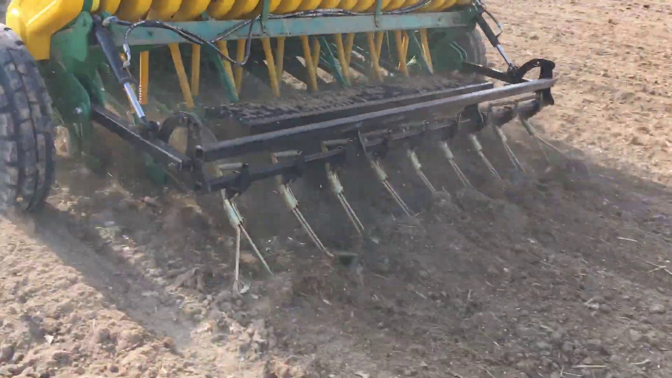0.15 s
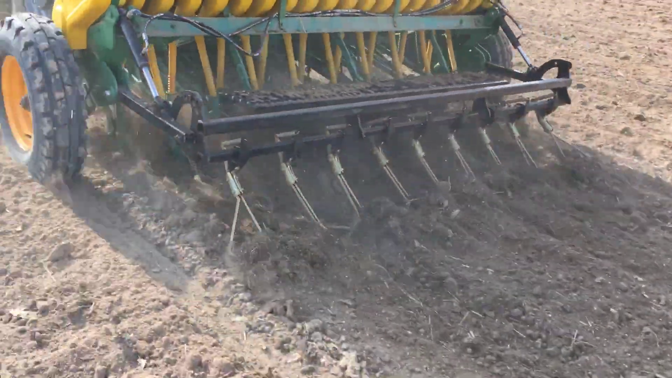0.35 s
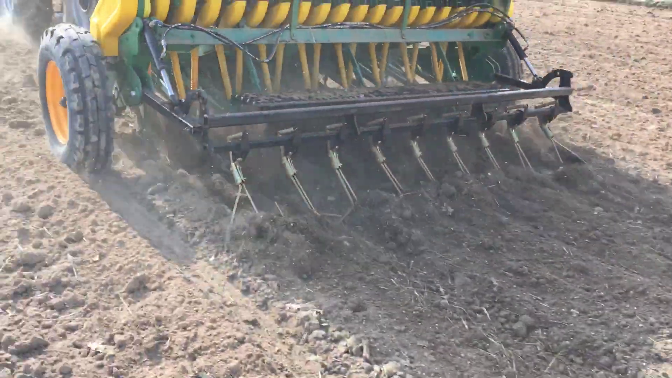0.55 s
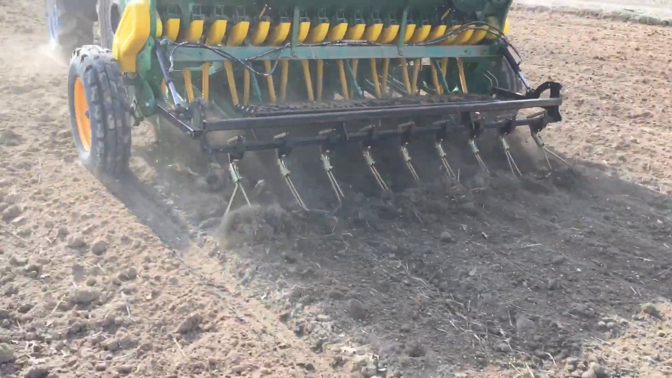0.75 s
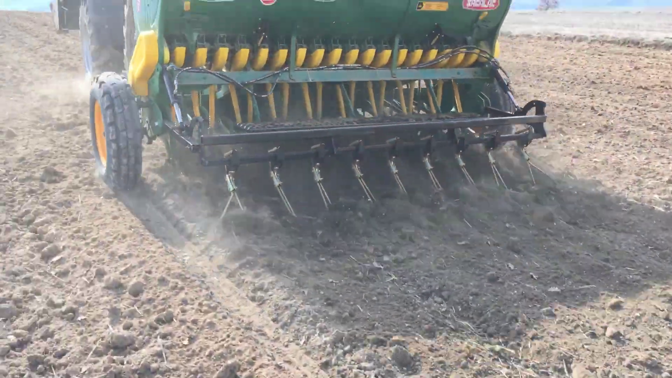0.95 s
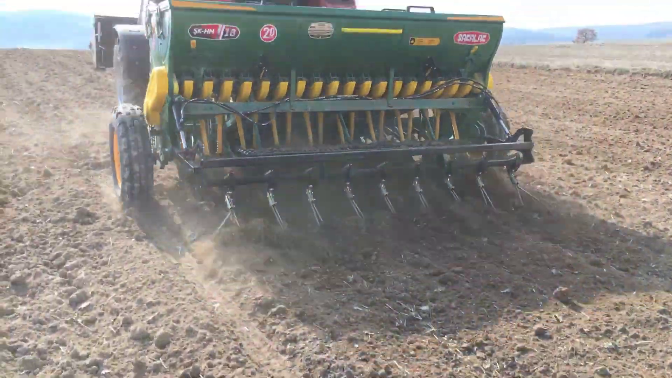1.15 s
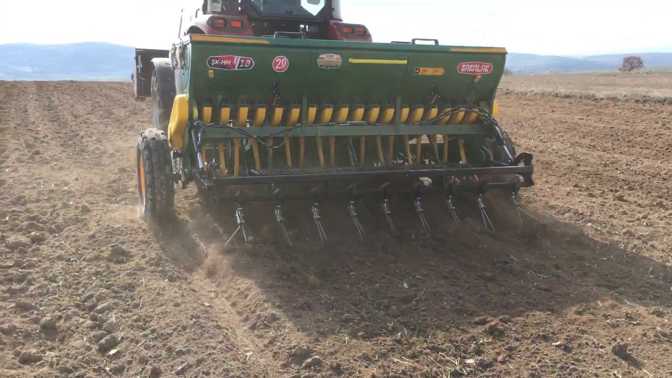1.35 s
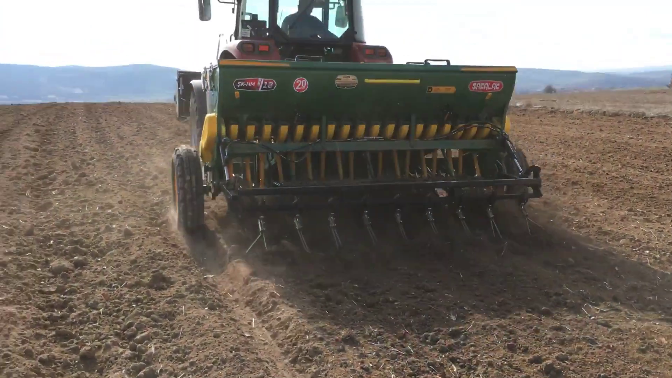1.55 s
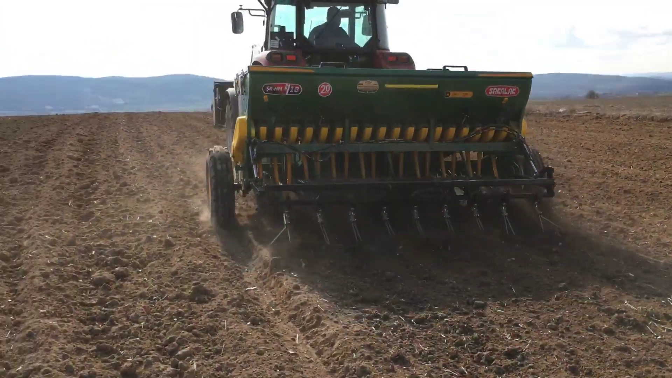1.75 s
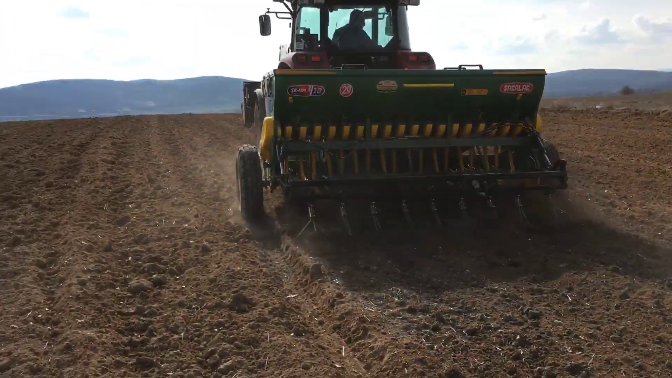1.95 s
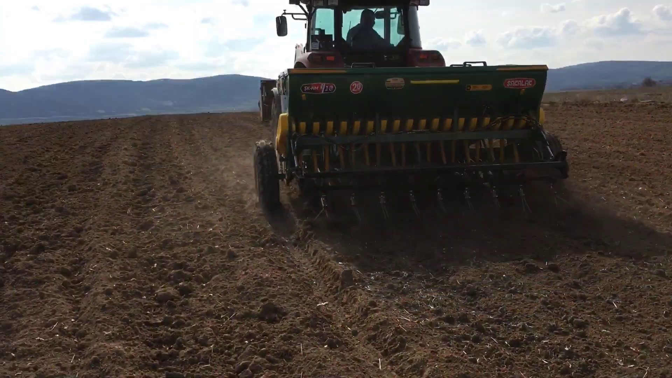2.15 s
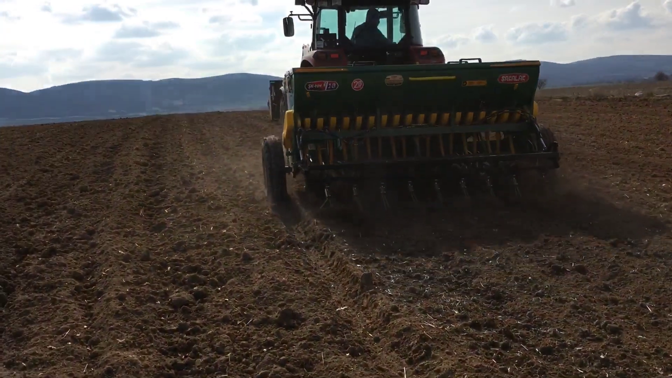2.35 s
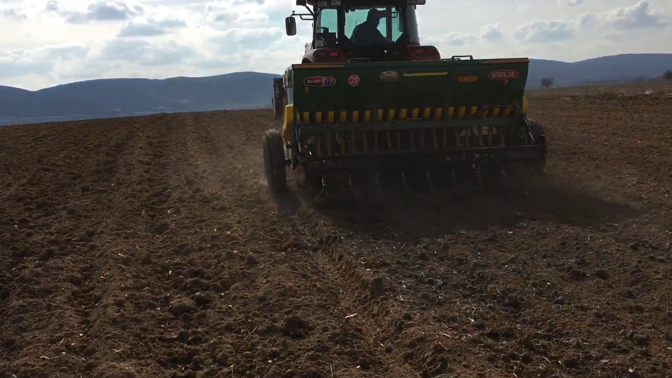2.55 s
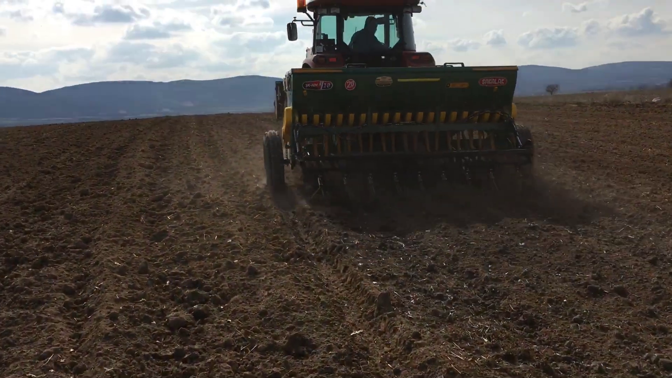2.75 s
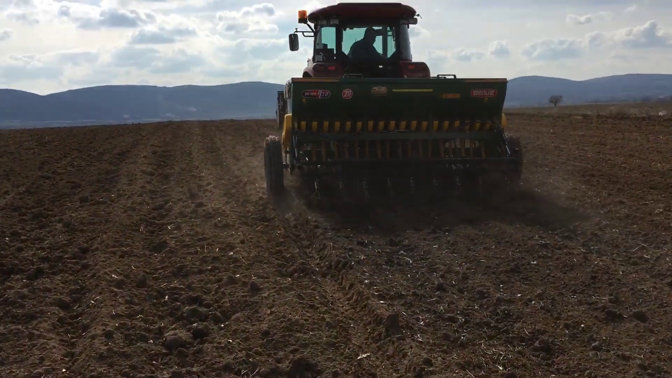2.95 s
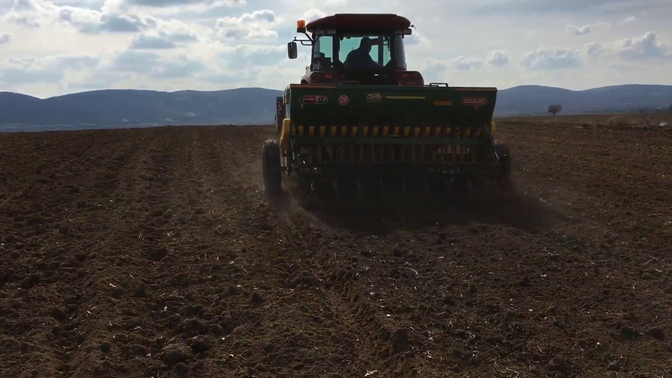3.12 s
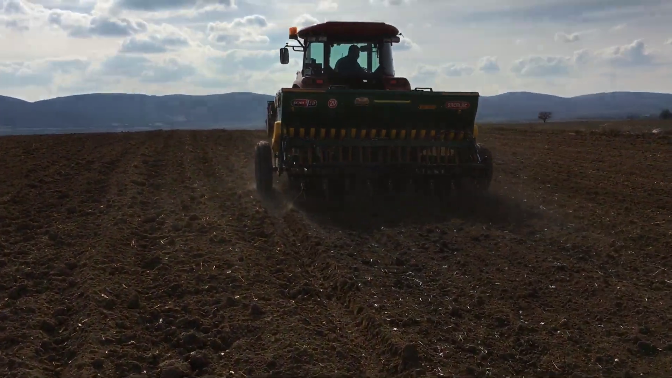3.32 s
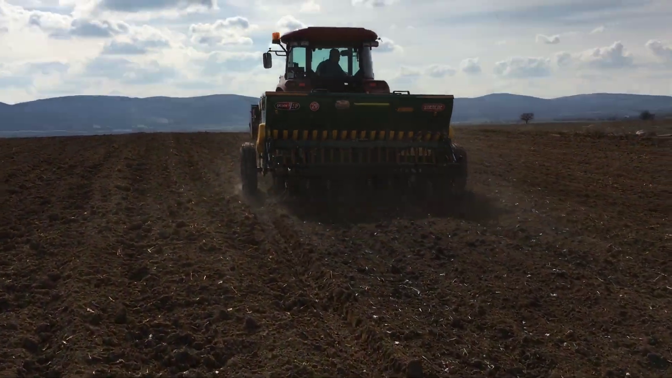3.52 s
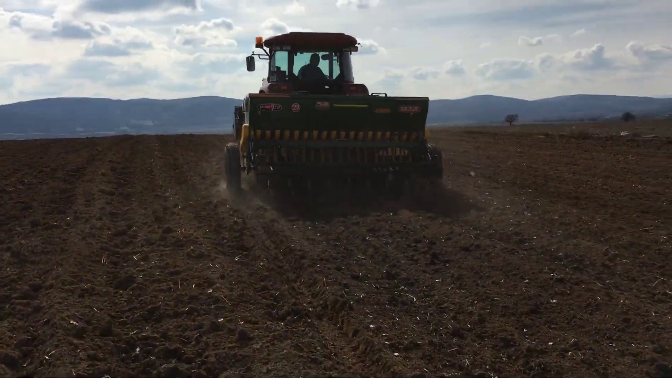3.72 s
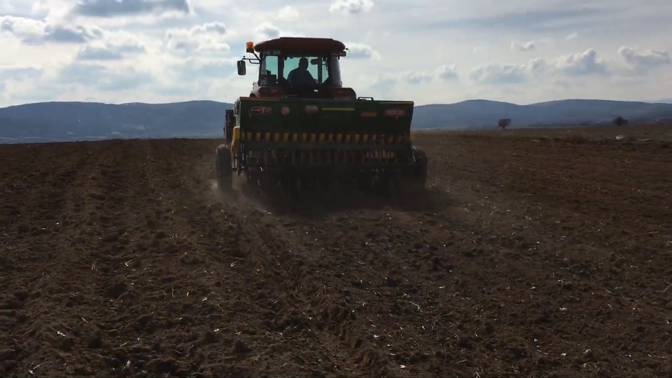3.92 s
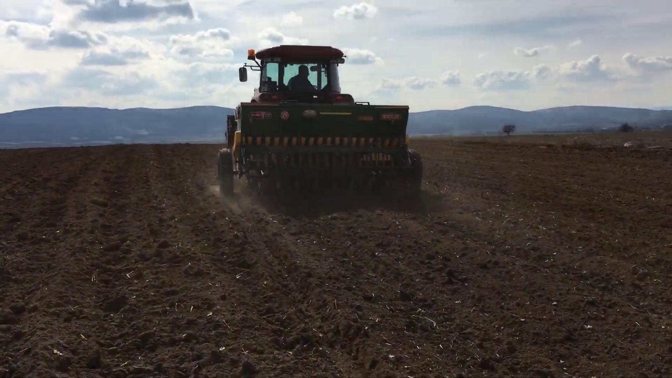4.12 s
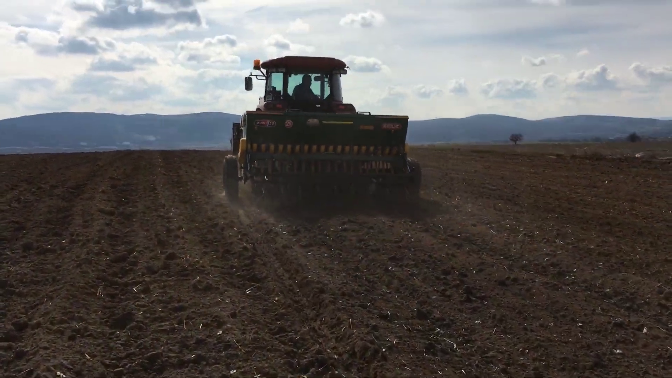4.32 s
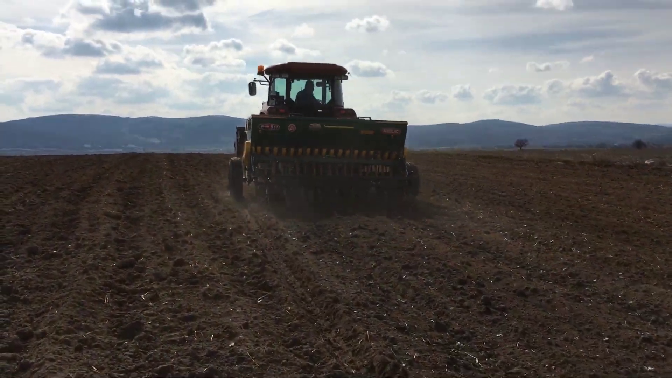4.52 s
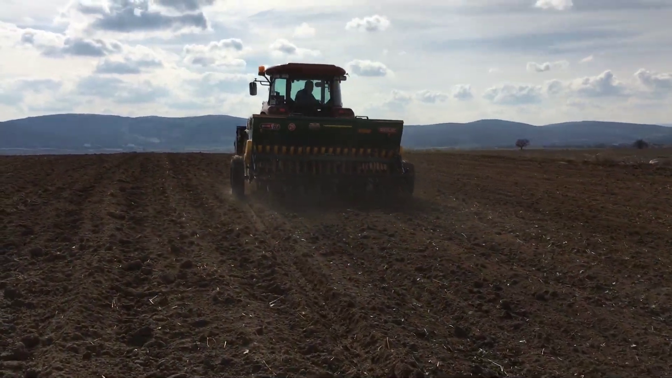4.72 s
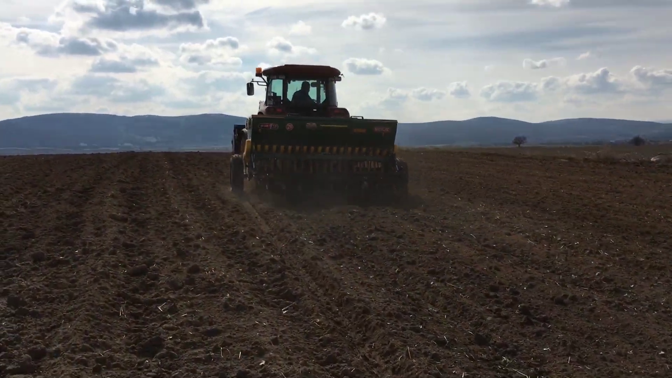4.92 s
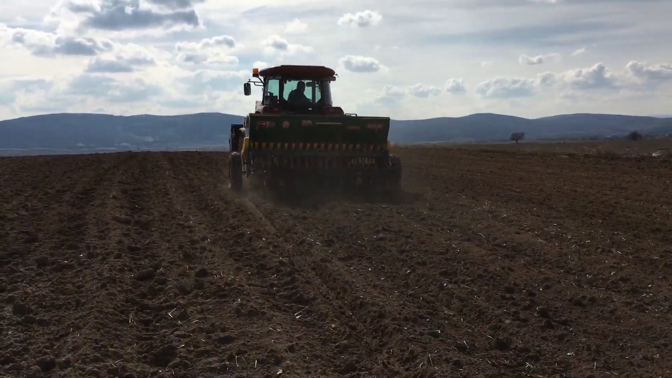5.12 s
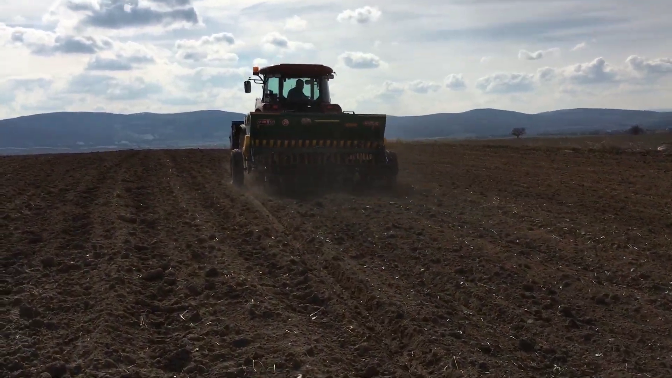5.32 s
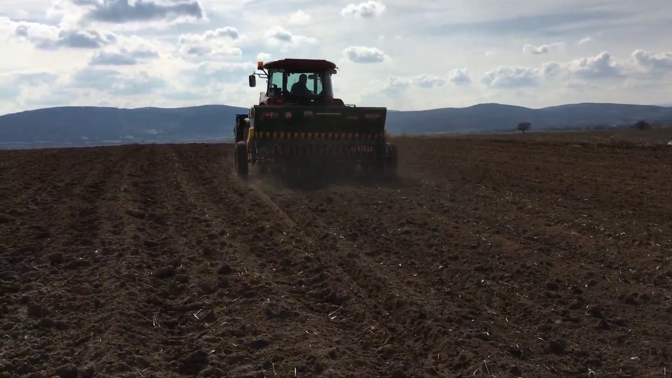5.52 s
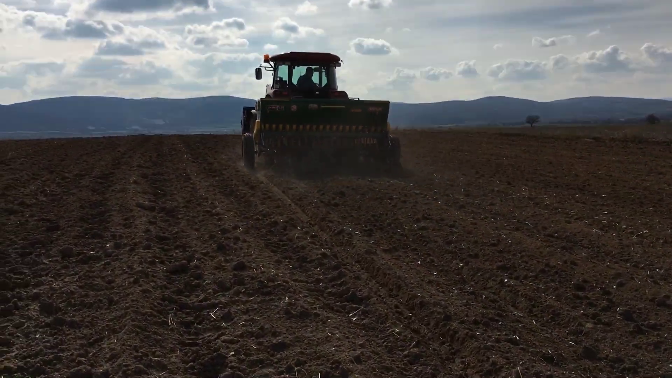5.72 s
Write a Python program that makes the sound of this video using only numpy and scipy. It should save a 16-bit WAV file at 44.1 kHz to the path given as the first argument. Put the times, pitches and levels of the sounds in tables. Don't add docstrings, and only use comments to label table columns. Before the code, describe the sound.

Close, loud tractor engine with metallic clatter and gear whine gradually recedes across open soil, amid buffeting wind and faint tine scraping.

```python
import sys
import numpy as np
from scipy import signal
from scipy.fft import rfft, irfft
from scipy.io import wavfile
from scipy.ndimage import uniform_filter1d

SR = 44100
rng = np.random.default_rng(int(sys.argv[2]) if len(sys.argv) > 2 else 0)


def gain_from_decibels(decibels):
    exponent = np.asarray(decibels, float) / 20
    return 10 ** exponent


def output_pcm(signal):
    pcm = np.clip(np.atleast_2d(signal).T, -1, 1) * 32767
    wavfile.write(sys.argv[1], SR, np.round(pcm).astype(np.int16))


N = 258867

# frequency_hz [Hz], density_db [dB per Hz]
RUMBLE_SPECTRUM = [(20, -16), (35, 9), (52, 6), (75, 2), (110, -4.5), (160, -10), (300, -48)]
FLUTTER_SPECTRUM = [(90, -1), (150, 1), (250, 0), (400, -2), (550, -7.5), (1200, -14.5), (3000, -43.5)]
# frequency_hz [Hz], density_db [dB per Hz]
HISS_SPECTRUM = [(3000, -17), (4000, -9), (6000, -13), (8000, -13), (10000, -13), (10500, -20),
                 (11200, -14), (15700, -20.5)]
# centre_s [s], peak_db [dB], half_length_s [s]
GUSTS = [(.05, -33, 0.034), (.12, -20.5, 0.024), (.24, -24, 0.056), (.48, -21.5, 0.031), (.65, -23, 0.034),
         (.79, -29, .12), (1.08, -27, 0.043), (1.39, -31, 0.055), (1.68, -34, 0.049), (1.89, -27.5, 0.034),
         (2.13, -26, 0.14), (2.3, -28.5, .04), (2.5, -32.5, 0.56), (3.04, -34, .03), (3.31, -26.5, 0.091),
         (3.61, -27.5, 0.1), (3.72, -43, 0.013), (3.87, -31, .07), (4.35, -29.5, 0.037),
         (4.54, -38.5, 0.017), (4.86, -36, 0.06), (5.35, -30.5, 0.041), (5.56, -30.5, 0.11),
         (5.76, -33, .1), (5.87, -27.5, 0.049)]
# start_s [s], peak_db [dB], sharpness_hz [Hz], direction [+1 push, -1 pull]
POPS = [(.003, -14.5, 130.4, 1), (0.028, -14.5, 81, 1), (0.124, -20, 65, 1), (0.222, -22, 65.5, -1),
        (.448, -15, 261, 1), (0.651, -18, 450, 1), (0.658, -14, 90.5, 1), (0.7015, -15.5, 400, 1),
        (0.7598, -12.5, 360, 1), (0.7915, -19, 395, -1), (1.081, -19, 443, 1), (1.0978, -14.5, 420, -1),
        (1.104, -21, 500, 1), (2.034, -22.5, 75, 1), (2.144, -15, 70.4, -1), (2.279, -27, 200, 1),
        (2.2823, -17, 150, 1), (2.376, -16.5, 300, -1), (3.025, -23, 303, 1), (3.319, -20.5, 250, -1),
        (3.329, -24, 201, 1), (3.338, -17, 49, 1), (3.591, -13, 55.5, -1), (3.721, -22.5, 64, 1),
        (3.8044, -10.5, 287, -1), (3.831, -31, 300, 1), (3.838, -20.5, 70, 1), (3.875, -19.5, 70, 1),
        (5.329, -26, 275, 1), (5.335, -21.5, 55, 1)]
# centre_s [s], peak_db [dB], half_length_s [s]
CRACKLES = [
    (.655, -52, 0.012),
    (.68, -45, .008),
    (.708, -37, 0.0081),
    (.765, -49, .012),
    (.8, -56, 0.0075),
    (1.082, -48, 0.005),
    (1.102, -46, 0.003),
]

# time_s [s], level_db [dB]
LEAVING = [(0.0, -29), (0.36, -32), (0.5, -30), (0.85, -31.5), (1.5, -33.5), (3.02, -37.5), (3.45, -37),
           (4.45, -38.5), (4.74, -40), (5.48, -43.5), (5.72, -42), (5.87, -38)]
# mean_level_db [dB], share of the LEAVING curve [ratio]
EXHAUST_FALL = (-30.5, 0.39)
BODY_FALL = (-38, 0.85)
CLATTER_FALL = (-51.5, 1)
TINES_FALL = (-78.5, 0.87)
TYRES_FALL = (-45.5, 1.51)
# time_s [s], delay_ms [ms]
SOIL_ECHO = [(0, 0.47), (.6, 0.46), (1.15, 0.47), (1.8, 0.57), (4, 0.6), (5.87, 0.65)]

# pitch_hz [Hz], width_hz [Hz], near_db, a third of the way_db, far_db [dB]
TINE_MODES = [(4960, 310, -5, -5, -6), (5700, 200, -6, 0.5, -7.5), (6140, 480, -6, -3.5, -1.5),
              (6780, 550, -3, -7.5, -6), (8260, 880, -9, -10.5, -12), (9300, 770, -13.5, -12, -11),
              (11400, 1700, -15, -17.5, -19)]
# centre_s [s], peak_db [dB over steady scrape], half_length_s [s]
CLODS = [(.08, -2, 0.028), (.52, 4.5, 0.13), (1.05, 0.5, 0.066), (1.52, 5, 0.044), (1.88, 4.5, .1),
         (2.52, 2.5, 0.16), (3.86, 0.5, .12), (4.17, -4, .03), (5.02, 3, .02), (5.1, 2, .02),
         (5.82, 0.5, .04)]
# start_s [s], peak_db [dB]
STONES = [
    (0.8786, -50),
    (1.7499, -49.5),
    (2.3223, -58),
    (2.5716, -49),
    (5.61, -49),
]
# centre_s [s], pitch_hz [Hz], level_db [dB], half_length_s [s]
SQUEAKS = [(1.13, 7500, -75, 0.032), (1.83, 7420, -81, .04), (2.59, 7750, -81, .01), (3.18, 5770, -78, .02),
           (3.25, 6410, -79, .02), (3.32, 6410, -82., 0.043), (3.46, 6420, -76, .015),
           (3.612, 6600, -82, .02), (4.154, 5660, -83, .02), (5.027, 5690, -75, .02),
           (5.112, 5620, -78., .02), (5.33, 5780, -81., .03), (5.43, 5700, -78, 0.018),
           (5.818, 5700, -78., 0.014)]
# centre_s [s], peak_db [dB over steady clatter], half_length_s [s]
JOLTS = [
    (1.25, -3, .15),
    (1.92, -0.5, 0.059),
    (3.87, 0, 0.1),
    (5.42, 4.5, 0.21),
    (5.68, 0, 0.082),
]

# time_s [s], firings_per_s [Hz]
FIRING_RATE = [(0, 49.2), (.8, 49.2), (1.1, 50.2), (1.5, 50.9), (2.1, 51.1), (2.6, 51.5), (3.1, 51.2),
               (3.8, 51.9), (4.3, 51.9), (5.87, 52.05)]
# time_s [s], tooth_meshes_per_s [Hz]
MESH_RATE = [(0, 528), (1.1, 530), (1.5, 542), (2.3, 538), (2.7, 544), (3.05, 537), (3.9, 548), (4.5, 551),
             (4.95, 553), (5.87, 548)]
CYLINDER_DB = [-6, -11, -9, -11]
# multiple of firing rate [ratio], level_db [dB]
EXHAUST_ORDERS = [(1, -9.5), (2, -1.5), (3, -10.5), (4, -26), (5, -39.5), (6, -30)]
PUMP_ORDERS = [(11, -19), (12, -20), (13, -17), (13.5, -18), (14, -12), (15, -18.5)]
# multiple of mesh rate [ratio], level_db [dB]
GEAR_ORDERS = [(1, -27.5), (2, -16.5), (3, -24)]
# pitch_hz [Hz], width_hz [Hz], near_db, a third of the way_db, far_db
# [dB]
BLOCK_MODES = [(570, 96, -10.5, -0.5, 2), (703.2, 56, 1.5, 0.5, 1.5), (739, 57, -9.5, -2.5, -0.5),
               (798, 63, 10.5, 3.5, -15), (905.6, 57, 12, -3.5, -7.5), (927.3, 24, 7.5, -15, -7),
               (997.5, 54, 3.5, -3, -8.5), (1110, 91, -12, -7.5, -24.5)]
CLATTER_MODES = [(1387, 180, 5.5, -9.5, -6), (1627, 99, -14.5, -5.5, -2.5), (1824, 274, 2.5, -13, -7),
                 (2344, 200, -4.5, 0.5, 5), (2820, 560, -1.5, -2.5, -9), (3322, 353, -4, -11, -10),
                 (3720, 190, -21, -17, -16.5)]
INJECTOR_MODES = [(4105, 300, 0.5, -1.5, -9), (4510, 240, -7.5, -4, -12.5), (5320, 180, -5, -6, -12.5),
                  (7500, 130, -12, -13.5, -26.5)]


def rms_one(x):
    return x / np.sqrt(np.mean(x ** 2) + 1e-20)


def evened(x):
    return x / np.sqrt(uniform_filter1d(x ** 2, size=SR // 2) + 1e-20)


def in_time(rows):
    s, *columns = np.transpose(rows)
    return [np.interp(np.arange(N) / SR, s, column) for column in columns]


def drift(rate):
    r = np.exp(-80 * np.pi * rate / SR)
    noise = rng.standard_normal(N // 40 + 2002)
    slow = signal.lfilter([1], [1, -2 * r, r * r], noise)[2000:]
    return np.interp(np.arange(N) / 40, np.arange(len(slow)), rms_one(slow - slow.mean()))


def swells(rows):
    t = np.arange(0, N + 40, 40) / SR
    power = sum(gain_from_decibels(db) ** 2 * np.exp(-((t - s) / length) ** 2) for s, db, length in rows)
    return np.interp(np.arange(N) / SR, t, np.sqrt(power))


def coloured(spectrum):
    hz, db = np.transpose(spectrum)
    grid = np.arange(N // 2 + 1) * SR / N + 1
    gain = gain_from_decibels(np.interp(np.log(grid), np.log(hz), db, left=-90, right=-90))
    return rms_one(irfft(rfft(rng.standard_normal(N)) * gain, N))


def resonate(x, hz, width_hz):
    r = np.exp(-np.pi * width_hz / SR)
    poles = [1, -2 * r * np.cos(2 * np.pi * hz / SR), r * r]
    return signal.lfilter([(1 - r * r) / 2, 0, (r * r - 1) / 2], poles, x)


def body(drive, modes, patchy_db, patch_rate):
    distance, out = np.linspace(0, 2, N), 0
    for k, (hz, width_hz, *levels_db) in enumerate(modes):
        ring = resonate(drive, hz, 1.52 * width_hz)
        ring = resonate(ring, hz, 1.52 * width_hz) / np.sqrt(width_hz)
        waver_db = patchy_db * (drift(patch_rate) + 1.1 * drift(16))
        gain = gain_from_decibels(np.interp(distance, [0, .7, 2], levels_db) + waver_db)
        out = out + (-1) ** k * ring * gain
    return out


def receding(mean_db, share):
    level_db, = in_time(LEAVING)
    return gain_from_decibels(mean_db + share * (level_db - level_db.mean()))


def over_soil(x):
    lag = in_time(SOIL_ECHO)[0] * SR / 1000
    echo = np.interp(np.arange(N) - lag, np.arange(N), x)
    return evened(x + 0.4 * echo)


def wind_pop(sharp_hz):
    push = 2 * np.pi * sharp_hz * np.arange(SR // 12) / SR
    rebound = signal.cheby1(2, 3., 12.0 + 0.24 * sharp_hz, "high", fs=SR)
    pop = signal.lfilter(*rebound, push ** 1.1 * np.exp(-1.3 * push))
    pop = signal.lfilter(*signal.butter(3, 3000, fs=SR), pop)
    return pop / pop.max()


def wind():
    calm_db, flutter_below_db = -39, -13.5
    gust = swells(GUSTS)
    rumble_gain = np.hypot(gust, gain_from_decibels(calm_db)) * gain_from_decibels(-3.0 + 2.3 * drift(7.8))
    flutter_gain = np.hypot(gust * gain_from_decibels(flutter_below_db), receding(*TYRES_FALL))
    flutter_gain *= gain_from_decibels(1.0 + 2.12 * drift(26))
    out = rumble_gain * coloured(RUMBLE_SPECTRUM) + flutter_gain * coloured(FLUTTER_SPECTRUM)
    for s, db, sharp_hz, sign in POPS:
        pop = wind_pop(sharp_hz)
        at = round(s * SR)
        begun = max(-at, 0)
        out[at + begun:at + len(pop)] += np.sign(sign) * gain_from_decibels(db) * pop[begun:]
    return out


def crackle():
    ticks_per_s, low_hz, high_hz = 300, 910, 2330
    ticks = rng.standard_normal(N) * (rng.random(N) < ticks_per_s / SR)
    band = signal.butter(5, [low_hz, high_hz], "band", fs=SR, output="sos")
    return swells(CRACKLES) * rms_one(signal.sosfilt(band, ticks))


def microphone_hiss():
    return gain_from_decibels(-79.5) * coloured(HISS_SPECTRUM)


def tine_scrape():
    sizes = gain_from_decibels(2.1 * np.minimum(rng.exponential(1, N), 5)) * rng.choice([-1, 1], N)
    grains_per_s = 5000. * gain_from_decibels(1.6 * drift(14))
    grains = sizes * (rng.random(N) < grains_per_s / SR)
    ring = evened(body(grains, TINE_MODES, patchy_db=2.0, patch_rate=2.2))
    return receding(*TINES_FALL) * np.hypot(1, swells(CLODS)) * ring


def bearing_squeaks():
    t, out = np.arange(N) / SR, np.zeros(N)
    for s, hz, db, length in SQUEAKS:
        swell = np.exp(-((t - s) / length) ** 2)
        out += gain_from_decibels(db + 1.5 * drift(60)) * swell * np.sin(2 * np.pi * hz * t)
    return out


def stone_clicks():
    clicks = np.full(N, 1e-18)
    for s, db in STONES:
        clicks[round((s + .003) * SR)] = gain_from_decibels(db + 24.5)
    return resonate(clicks, 3900, 600)


def seed_drill():
    return tine_scrape() + bearing_squeaks() + stone_clicks()


def knocks(turns, decay, knock_db, spread_db, blow):
    fired = turns.astype(int)
    own_db = spread_db * np.clip(rng.standard_normal(fired[-1] + 1), -2, 1.4)
    strength = gain_from_decibels(knock_db + np.array(CYLINDER_DB)[fired % 4] + own_db[fired])
    fade = np.exp(-(turns - fired) / decay)
    burst = rng.standard_normal(N) * (1 + strength * fade)
    return burst + blow * strength * np.diff(fired, prepend=0)


def tones(turns, orders, waver_db, wander):
    out = 0
    for k, db in orders:
        gain = np.sqrt(2) * gain_from_decibels(db + waver_db * drift(20.4))
        out = out + gain * np.sin(2 * np.pi * k * turns + wander * drift(5.36))
    return out


def exhaust_drone(turns):
    drone = tones(turns, EXHAUST_ORDERS, waver_db=0.84, wander=0.62)
    return receding(*EXHAUST_FALL) * gain_from_decibels(-3.0) * drone


def block_knock(turns):
    drive = knocks(turns, decay=0.47, knock_db=3.5, spread_db=1.5, blow=16.0)
    return over_soil(body(drive, BLOCK_MODES, patchy_db=0.1, patch_rate=1.0))


def pump_and_gear_whine(turns, meshes):
    pump = tones(turns, PUMP_ORDERS, waver_db=5.5, wander=1.0)
    gearbox_db = np.interp(turns / turns[-1], [0, .4, 1], [-11., -2., 2.])
    return pump + gain_from_decibels(gearbox_db) * tones(meshes, GEAR_ORDERS, waver_db=0.5, wander=0.9)


def upper_clatter(turns):
    drive = knocks(turns, decay=0.36, knock_db=-1.5, spread_db=3.5, blow=15.0)
    return over_soil(body(drive, CLATTER_MODES, patchy_db=1.27, patch_rate=0.24))


def injector_tick(turns):
    drive = knocks(turns + 0.036, decay=0.18, knock_db=10.5, spread_db=5.0, blow=7.3)
    return evened(body(drive, INJECTOR_MODES, patchy_db=0.9, patch_rate=4.2))


def tractor():
    turns = np.cumsum(in_time(FIRING_RATE)[0]) / SR
    meshes = np.cumsum(in_time(MESH_RATE)[0]) / SR
    engine = receding(*BODY_FALL) * (block_knock(turns) + pump_and_gear_whine(turns, meshes))
    clatter = upper_clatter(turns) + gain_from_decibels(-24.5) * injector_tick(turns)
    clatter *= receding(*CLATTER_FALL) * np.hypot(1, swells(JOLTS))
    return exhaust_drone(turns) + engine + clatter


def scene():
    return (wind() + crackle() + microphone_hiss() + seed_drill() + tractor())[None]


def top_cut(x):
    return signal.sosfilt(signal.butter(12, 15720, fs=SR, output="sos"), x)


def record(dry):
    wind_cut = signal.cheby1(2, 2.5, 49.4, "high", fs=SR, output="sos")
    run_in = np.pad(dry, ((0, 0), (4000, 0)), "reflect")
    cut = signal.sosfilt(wind_cut, run_in)[:, 4000:]
    cut = cut * np.minimum(np.arange(N, 0, -1) / 90, 1)
    return top_cut(gain_from_decibels(2.5) * cut)


dry = scene()
out = record(dry)
output_pcm(out)
```